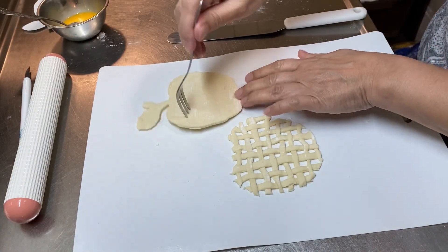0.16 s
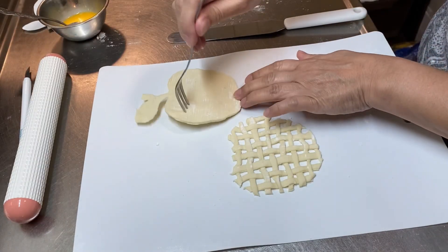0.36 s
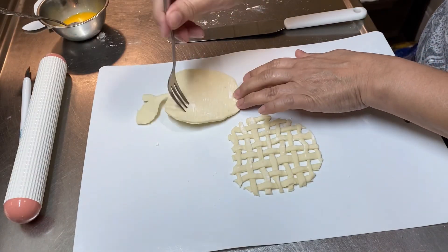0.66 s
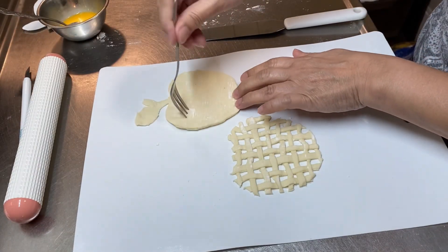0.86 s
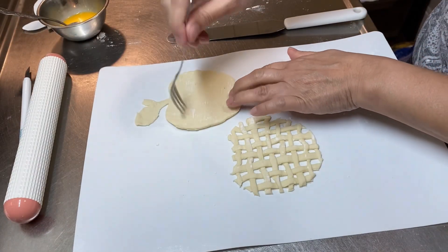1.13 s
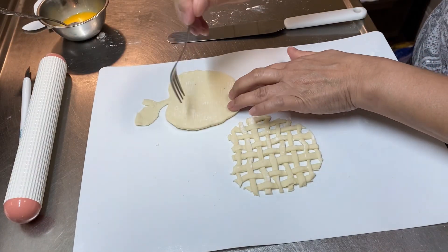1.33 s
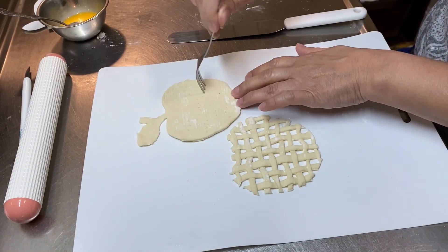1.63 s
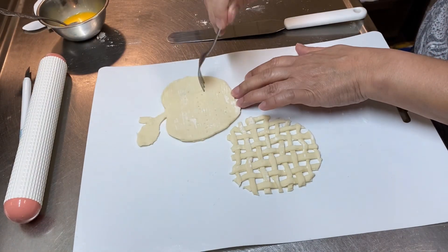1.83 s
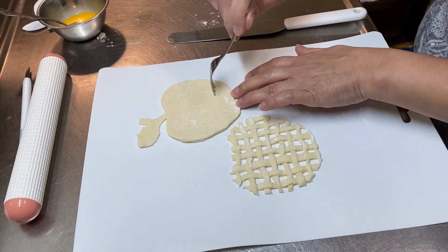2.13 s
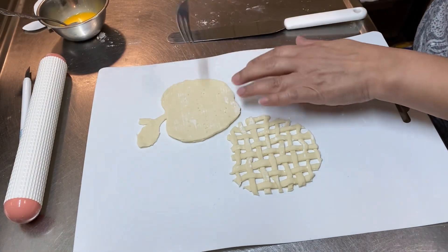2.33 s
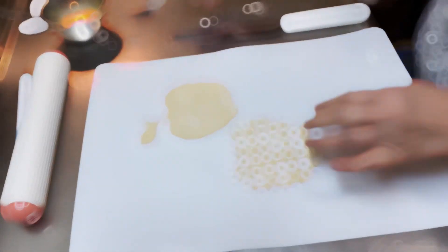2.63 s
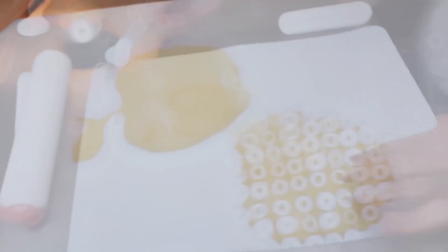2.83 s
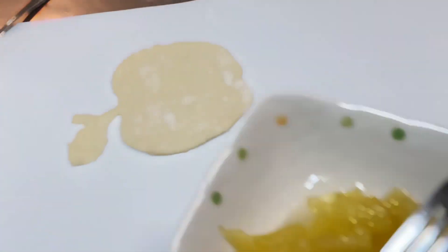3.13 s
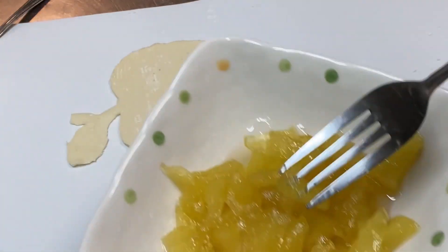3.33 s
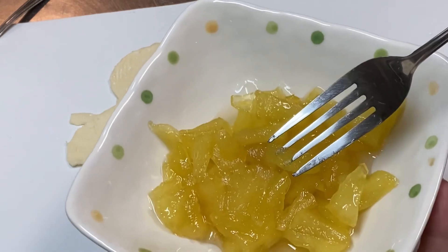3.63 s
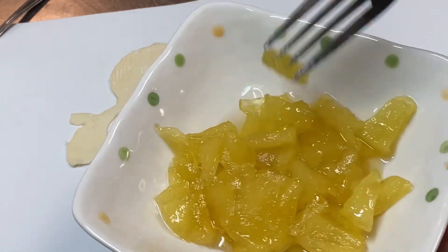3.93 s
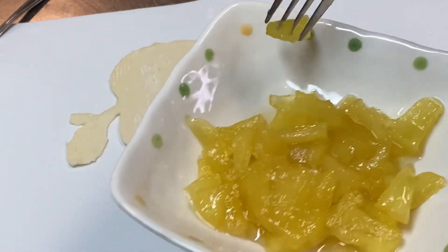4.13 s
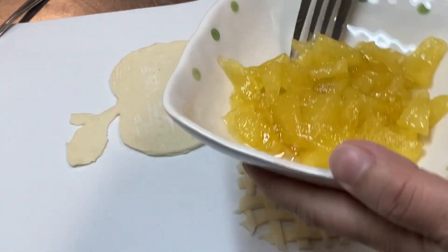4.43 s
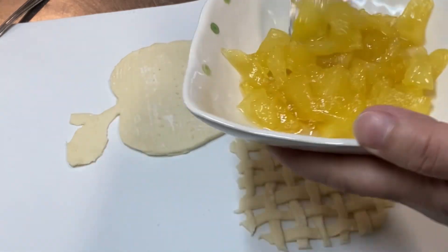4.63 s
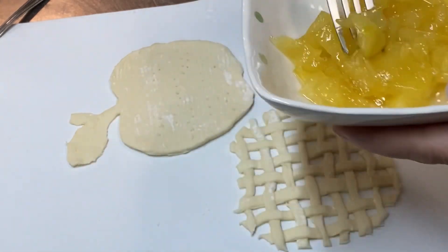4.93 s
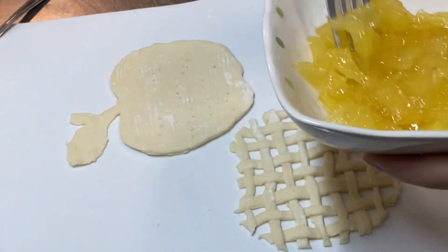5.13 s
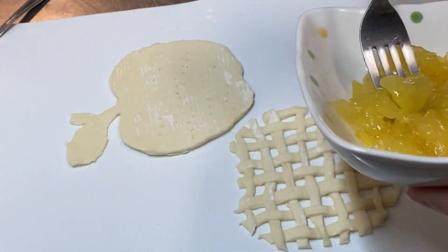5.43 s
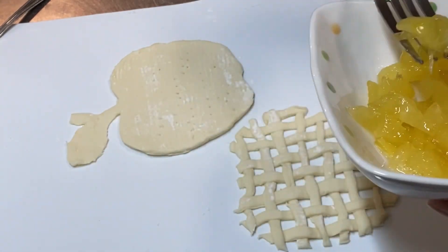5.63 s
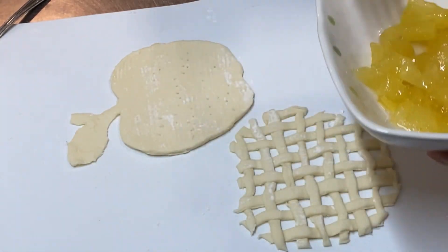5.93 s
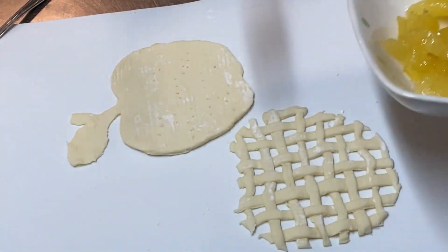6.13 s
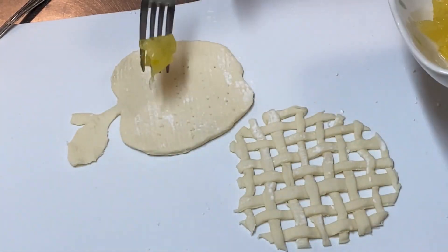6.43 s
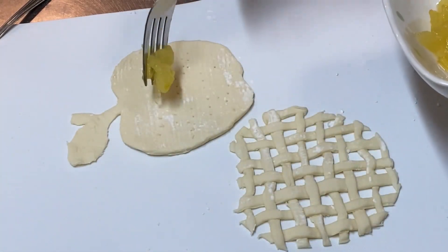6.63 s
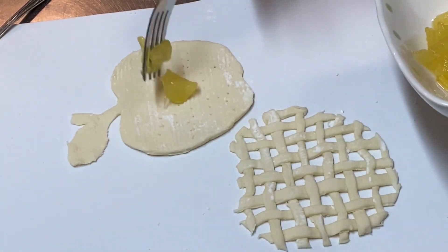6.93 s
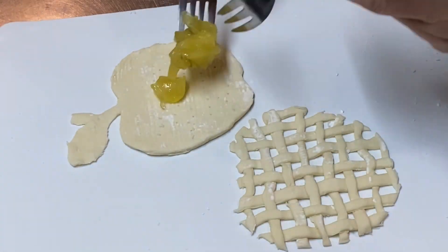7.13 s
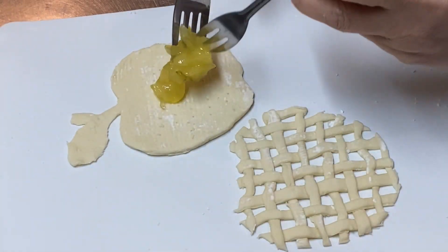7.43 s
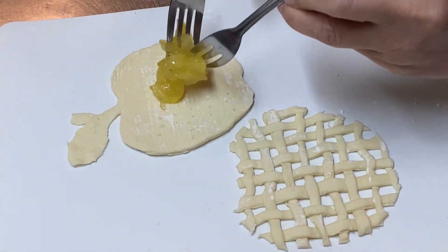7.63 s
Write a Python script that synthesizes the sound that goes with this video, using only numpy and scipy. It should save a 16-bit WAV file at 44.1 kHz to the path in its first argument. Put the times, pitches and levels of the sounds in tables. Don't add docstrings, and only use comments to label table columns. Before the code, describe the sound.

A fork pricks dough with hollow tocks and bright ticks over a low motor hum; dishes crash, then steel clinks softly on a ceramic bowl.

```python
import sys
import numpy as np
from scipy import signal
from scipy.fft import rfft, irfft, next_fast_len
from scipy.io import wavfile
from scipy.ndimage import uniform_filter1d

SR = 44100
rng = np.random.default_rng(int(sys.argv[2]) if len(sys.argv) > 2 else 0)


def level_to_linear(level):
    exponent = np.asarray(level, float) / 20
    return 10 ** exponent


def int16_out(signal):
    q = np.round(np.clip(np.atleast_2d(signal).T, -1, 1) * 32767)
    wavfile.write(sys.argv[1], SR, q.astype(np.int16))


N = 342434
T = np.arange(N) / SR

CHANGES = [1.4546, 3.2675, 7.1323]


def evened(x):
    return x / np.sqrt(np.mean(x ** 2) + 1e-20)


def read(points, hz):
    f, value = np.transpose(points)
    return np.interp(np.log(hz + 1), np.log(f + 1), value)


def curve(rows, column=1):
    columns = np.transpose(rows)
    return np.interp(T, columns[0], columns[column])


def colour(x, points):
    size = next_fast_len(x.shape[-1])
    gain = level_to_linear(read(points, np.fft.rfftfreq(size, 1 / SR)))
    return irfft(rfft(x, size) * gain, size)[..., :x.shape[-1]]


def resonate(x, hz, width):
    b, a = signal.iirpeak(min(hz, SR / 2.2), hz / width, SR)
    return signal.lfilter(b, a, x)


def steep(x, hz, width):
    return evened(resonate(resonate(x, hz, width), hz, width))


def add(mix, s, sound):
    part = mix[round(s * SR):][:len(sound)]
    part += sound[:len(part)]


def ring(modes, rise):
    t = T[:SR // 5]
    x = sum(level_to_linear(db - 60 * t / t60) * np.sin(2 * np.pi * hz * t) for hz, db, t60 in modes)
    x = x * (1 - np.exp(-(t / rise) ** 2))
    return x / abs(x).max()


def burst(rise, length):
    t = T[:SR // 5]
    return rng.standard_normal(len(t)) * (1 - np.exp(-t / rise)) * np.exp(-t / length)


def strokes(rows):
    total = 0
    for s, db, swell, fade, *_ in rows:
        distance = np.where(T < s, (s - T) / swell, (T - s) / fade)
        total = total + level_to_linear(db - 21 * np.minimum(distance, 9) ** 1.4)
    return total


def room(x):
    # f/Hz, time/s
    decay = [(100, .3), (500, .3), (2000, .25), (6000, 0.24), (14000, 0.2)]
    taps = np.zeros((2, SR // 2))
    slots = np.arange(150, SR // 2 - 20, 20)
    at = slots + rng.integers(0, 20, (2, len(slots)))
    np.put_along_axis(taps, at, rng.choice([-1., 1.], at.shape), 1)
    hz, t, z = signal.stft(taps, SR, nperseg=256)
    tail = signal.istft(z * level_to_linear(-60 * t / read(decay, hz)[:, None]), SR, nperseg=256)[1]
    return signal.fftconvolve(x[None], tail / np.linalg.norm(tail[0]), axes=1)[:, :N]


def placed(x, wet_db, side):
    return x * np.array([[1], [side]]) + level_to_linear(wet_db) * room(x)


def hum():
    # t/s, level/dB
    load = [(0.0, -48), (1.4, -48.5), (1.7, -48.5), (2.1, -46), (2.42, -41), (3.2, -39.5), (3.3, -41.5),
            (3.9, -46), (4.2, -45), (4.85, -45.5), (5.3, -43.5), (5.8, -49), (6.1, -43), (6.7, -48),
            (7.05, -47), (7.3, -44.5), (7.76, -46),
            (1.45, -41), (7.13, -44)]
    # f/Hz, width/Hz, level/dB
    rumble = [(33.2, 14, -70), (49.4, 11, -55.5), (60.23, 12, -58.5), (82.75, 13, -54.5),
              (111.5, 9.8, -59.5), (147.6, 25, -70.5), (492.2, 39, -72)]
    hum_hz, beat_hz, beat_crest_s = 100.05, 2.546, 0.083
    part = np.minimum(np.searchsorted(CHANGES, T), len(CHANGES))
    first = part == 0
    since_crest = T - np.array(CHANGES + CHANGES[-1:])[part]
    beat = 1 + 0.35 * first * np.cos(2 * np.pi * beat_hz * (T - beat_crest_s))
    tone = np.sqrt(2) * beat * np.cos(2 * np.pi * hum_hz * since_crest + np.pi * (part > 0))
    stir = rng.standard_normal((len(rumble) + 1, N))
    modes = sum(level_to_linear(db) * steep(x, hz, width) for x, (hz, width, db) in zip(stir, rumble))
    waver = level_to_linear(-8.5) * steep(stir[-1], hum_hz, 9)
    level = level_to_linear(curve(sorted(load)))
    return level * (tone + waver) + level_to_linear(-2.5 * first) * modes


def air():
    # t/s, level/dB, brightness above 1 kHz/dB
    flow = [(0.0, -63, 2), (0.55, -63.5, 1), (1.0, -63.5, -1), (1.4, -63.5, 0), (1.6, -61.5, -5),
            (2.07, -61, 2.5), (2.36, -60, -1), (3.13, -56, -1), (3.27, -62.5, -1.5), (3.7, -63.5, 1),
            (5.14, -63, 2), (7.1, -63, 0), (7.16, -60.5, 1.5), (7.76, -61.5, 2.5)]
    # f/Hz, level per Hz/dB
    rush = [(60, -40), (130, 7.5), (200, -7.5), (330, -5.5), (500, -9), (700, -13), (1200, -14.5),
            (1600, -22), (2500, -24.5), (3200, -33), (4500, -37), (7000, -50), (10000, -44.5),
            (14000, -45.5)]
    hz, t, z = signal.stft(colour(rng.standard_normal((2, N)), rush), SR, nperseg=512)
    patches = uniform_filter1d(rng.standard_normal(z.shape[1:]), size=8, axis=0)
    patches = uniform_filter1d(patches, size=30, axis=1)
    level_db, bright_db = curve(flow), curve(flow, column=2)
    top = .8 * (level_db + 61) + 0.48 * bright_db
    lift_db = np.outer(read([(700, 0), (1300, 1)], hz), np.interp(t, T, bright_db))
    top_share = read([(2200, 0), (3200, 1), (5000, 1), (7000, 0)], hz)
    top_db = np.outer(top_share, np.interp(t, T, top))
    field_db = 1.5 * evened(patches) + lift_db + top_db
    return level_to_linear(level_db + 3.5) * evened(signal.istft(z * level_to_linear(field_db), nperseg=512)[1][:, :N])


def rustle():
    # peak t/s, level/dB, swell/s, fade/s
    brushes = [(.256, -82, 0.038, 0.1), (1.1, -93, .04, 0.068), (1.612, -85, .015, 0.063),
               (1.68, -83, 0.016, .06), (1.85, -86, 0.028, 0.074), (1.96, -83, .02, 0.062),
               (2.095, -81, .015, 0.36), (2.36, -90, 0.027, 0.58), (2.56, -83.5, 0.12, 0.26),
               (2.67, -78.5, .04, 0.098), (3.886, -80.5, 0.016, 0.041), (4.003, -72, .015, 0.15),
               (4.1, -88.5, 0.082, 0.71), (4.97, -85.5, 0.11, 0.89), (5.27, -83, 0.059, 0.073),
               (6.36, -83, 0.14, 0.18), (6.748, -70, 0.01, 0.057),
               (5.5, -88, .02, .3)]
    # peak t/s, level/dB, swell/s, fade/s, resonance f/Hz
    rubs = [(.14, -73.5, .08, .09, 2180), (.46, -76.5, .035, 0.046, 1990), (.83, -83, 0.043, .06, 1970),
            (3.752, -80.5, .015, 0.16, 2470), (4.472, -71.5, 0.081, .14, 3120),
            (7.026, -89, 0.015, .08, 2100)]
    grain_db = 2.1 * evened(uniform_filter1d(rng.standard_normal(N), size=200))
    rub = rng.standard_normal((2, 2, N)) * level_to_linear(grain_db)
    focus = sum(strokes([row]) * steep(rub[1], row[-1], 940) for row in rubs)
    rubbing = steep(rub[0], 12000, 4700) + 1.8 * steep(rub[1], 3200, 3700)
    broad = strokes(brushes + rubs) * rubbing
    return level_to_linear(2.5) * (broad + level_to_linear(2) * focus)


def clinks():
    # t/s, peak/dB
    tine = [(.243, -71.5)]
    # t/s, peak/dB
    scoop = [(6.268, -68), (6.285, -64), (6.31, -73), (6.34, -68)]
    # t/s, peak/dB
    juice = [(4.61, -62.5), (5.05, -70), (7.03, -59)]
    # t/s, peak/dB
    handle = [(2.526, -58.5)]
    # t/s, peak/dB
    rim = [(2.633, -31.5), (2.643, -35), (2.658, -48)]
    # t/s, peak/dB
    bowl = [(3.989, -51), (4.003, -46), (4.017, -50)]
    # f/Hz, level/dB, time to die by 60 dB/s
    tine_modes = [(5500, -5, .1), (6840, 4, .15), (6900, -4, 0.17)]
    scoop_modes = [(3000, 0, .04), (3200, 4, .05), (3450, -1, .04), (4700, -4, .06), (5600, -5, .05)]
    juice_modes = [(12800, -8, .01), (14320, -5, .015), (15310, 2, .01)]
    handle_modes = [(3080, -3, 0.21), (3440, 1, .1), (5000, 3, 0.037), (5650, -3, 0.12), (6830, -5, .1)]
    rim_modes = [(2840, 0, 0.029), (3020, -1, 0.033), (3800, -0.5, 0.017), (4060, -7, 0.049),
                 (4900, -7, 0.025), (6250, -19, 0.077), (6340, 5.5, 0.01), (8850, 13.5, 0.011),
                 (11300, -5, 0.036), (11820, -7, 0.046)]
    bowl_modes = [(2272, -7, .05), (3068, -5, .06), (4200, -19, .08), (4400, -19, .08), (5430, -4, .12),
                  (5560, -2, .16), (5680, -2, .1), (12000, -12, .06), (12700, -14, .06)]
    spots = ((tine, tine_modes), (scoop, scoop_modes), (juice, juice_modes),
             (handle, handle_modes), (rim, rim_modes), (bowl, bowl_modes))
    out = np.zeros(N)
    for touches, modes in spots:
        for s, db in touches:
            chatter = burst(0.0001, 0.0017)
            rung = signal.fftconvolve(chatter, ring(modes, 0.0006))[:len(chatter)]
            tick = .25 * resonate(chatter, 6400, 9000)
            add(out, s, level_to_linear(db) * (rung / abs(rung).max() + tick))
    return out


def pricks():
    # t/s, peak/dB, ring f/Hz, tick level/dB, ring length as a factor
    jabs = [
        (0.405, -42, 1910, -49, 1.45),
        (0.4544, -56, 1920, -34.5, 1.4),
        (0.6612, -44, 1880, -50, 1.5),
        (1.6172, -50.5, 1970, -26.5, 1.3),
        (1.9316, -24, 1840, -36, 2.5),
        (2.9357, -33, 2350, -25, .85),
    ]
    # multiple of the ring, level/dB, time to die by 60 dB/s
    mat = [(.78, -5, .004), (.95, 0, .007), (1.15, -2, .005), (1.35, -2, .004), (1.55, -4, .004),
           (1.75, -8, .003)]
    tocks, ticks = np.zeros((2, N))
    for s, db, hz, tick_db, lasting in jabs:
        t = np.arange(0, lasting * .0016, 1 / SR)
        overtone = level_to_linear(-2) * np.exp(-t / .0011) * np.sin(2 * np.pi * 1.5 * hz * t)
        tones = np.sin(2 * np.pi * hz * t) + overtone
        add(tocks, s, level_to_linear(db + 1.0) * np.sin(np.pi * t / t[-1]) ** 1.1 * tones)
        modes = [(k * hz, d, lasting * t60) for k, d, t60 in mat]
        add(tocks, s, level_to_linear(db - 6.5) * ring(modes, 0.00051))
        add(ticks, s, level_to_linear(db + tick_db + 17) * resonate(burst(0.00013, 0.0036), 6000, 12000))
    return placed(tocks, -11.5, -0.12) + placed(ticks, -3.5, -.2)


def knocks():
    # t/s, peak/dB, bass/dB, panel/dB, edge/dB
    blows = [
        (1.618, -38, 4, -4, -14),
        (1.931, -38, 2.5, -7.5, -0.5),
        (2.093, -35, 3.5, -3.5, -16.5),
        (3.033, -40, -14, -19.5, 5),
        (5.066, -47.5, -7, -6, -4.5),
        (5.669, -33.5, -19, 0, -6.5),
        (5.693, -37.5, -6, 4.5, -6),
        (6.029, -59, 3, 5, -9),
        (6.59, -45.5, -4, -4.5, -15),
        (6.744, -51.5, 6, -8, -2.5),
    ]
    # f/Hz, width/Hz, level/dB
    counter = [(320, 140, -3), (513, 180, 2), (840, 89, -10)]
    out = np.zeros(N)
    for s, db, bass_db, panel_db, edge_db in blows:
        blow = burst(0.0023, 0.0086)
        body = evened(sum(level_to_linear(d) * steep(blow, hz, width) for hz, width, d in counter))
        boom = level_to_linear(bass_db + 6) * steep(steep(burst(.006, .025), 62, 50), 62, 50)
        panel = level_to_linear(panel_db + 7.0) * steep(burst(0.002, 0.014), 160, 41)
        edge = steep(steep(burst(0.0031, 0.0099), 1350, 2400), 1350, 2400)
        add(out, s, level_to_linear(db - 21.5) * (body + boom + panel + level_to_linear(edge_db - 2.0) * edge))
    return out


def clatter():
    # t/s, peak/dB, brightness/dB, weight/dB, rattle/s
    clashes = [
        (3.031, -31.5, -2.5, -1.5, 0.0078),
        (3.153, -16, -5, -1.5, 0.0073),
        (3.2, -6.5, 4.5, 1.5, 0.021),
               (3.141, -40, -9, 0, .03)]
    # f/Hz, level per Hz/dB
    crack_colour = [(60, -21), (150, -5), (270, -1.5), (400, -8), (600, 0.5), (1000, -6.5), (1400, -4.5),
                    (2200, -12.5), (5000, -14), (6300, -17), (10000, -13.5), (16000, -9)]
    # f/Hz, level/dB, time to die by 60 dB/s
    dish_modes = [(550, 0, .06), (760, -4, .08), (980, -4, .08), (1230, -5, .1), (1470, -5, .1),
                  (2697, -9, .1), (3257, -11, .06), (3550, -11, .1), (4280, -11, .1), (6180, -5, .06),
                  (10030, -6, .2), (12600, -5, .04)]
    out = np.zeros(N)
    for s, db, bright_db, weight_db, length in clashes:
        bounces_db = 0.83 * np.minimum(rng.exponential(1, SR // 5), 3)
        rattle = burst(0.00041, length) * level_to_linear(bounces_db)
        tilt = [(300, weight_db), (1500, 0), (8000, bright_db)]
        crack = colour(colour(rattle, crack_colour), tilt)
        crack[-SR // 20:] = 0
        dishes = signal.fftconvolve(rattle[:SR // 100], ring(dish_modes, .0003))[:len(crack)]
        add(out, s, level_to_linear(db - 15.5) * (evened(crack) + .2 * evened(dishes)))
    return out


def scene():
    # f/Hz, level/dB
    mid_colour = [(7600, 0.5), (8400, -14), (9400, -21.5), (10000, -6.5), (13500, -5.5), (14500, -16.5),
                  (16000, -23.5)]
    # f/Hz, level/dB
    side_air = [(60, -20), (130, -12), (300, 0.5), (1300, 1), (2600, -6.5), (4400, -14.5), (8000, -3),
                (14000, -15)]
    low = hum()
    air_mid, air_side = air()
    near = placed(clinks(), -12.0, 0.12) + pricks() + placed(knocks(), -1, .1)
    far = placed(clatter(), 0.37, -.12) * (T < CHANGES[1])
    mid, side = near + far + rustle()
    side_colour = [(100, -13.5), (280, -10), (550, -1.5), (2000, 2), (4000, -2), (9000, 0.5), (13000, -8.5)]
    side = colour(side, side_colour) + colour(air_side, side_air)
    whine = level_to_linear(-98) * steep(air_mid, 4301, 30)
    mid = colour(mid + air_mid + whine, mid_colour) + low
    side = side + .14 * low
    return np.array([mid + side, mid - side])


def low_pass(x):
    return signal.sosfilt(signal.butter(12, 16630, fs=SR, output="sos"), x)


def record(dry):
    since_changes = [np.where(T >= s, T - s, 1) for s in CHANGES]
    since = np.min(since_changes + [8 * T], 0)
    fade = np.sin(np.pi / 2 * np.clip(since / 0.02, 0, 1)) ** 2
    return low_pass(dry * fade)


dry = scene()
out = record(dry)
int16_out(out)
```